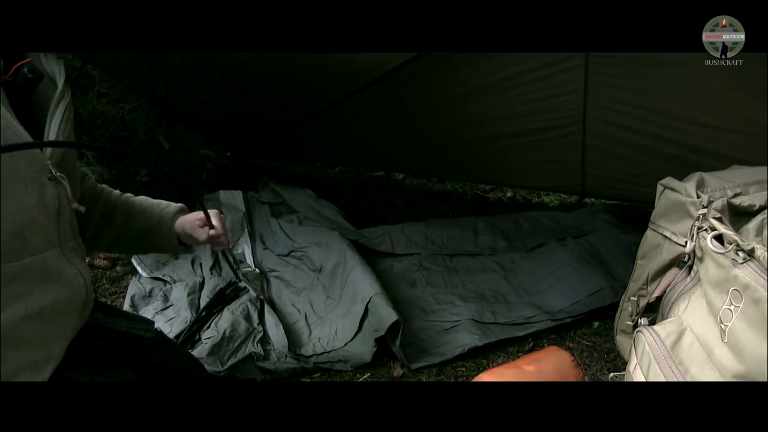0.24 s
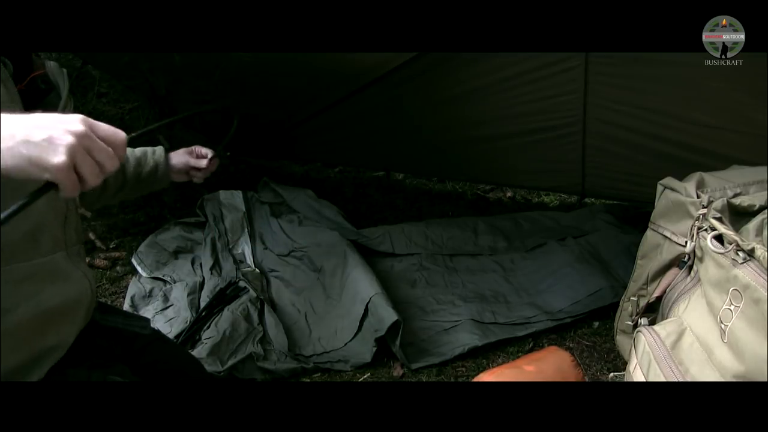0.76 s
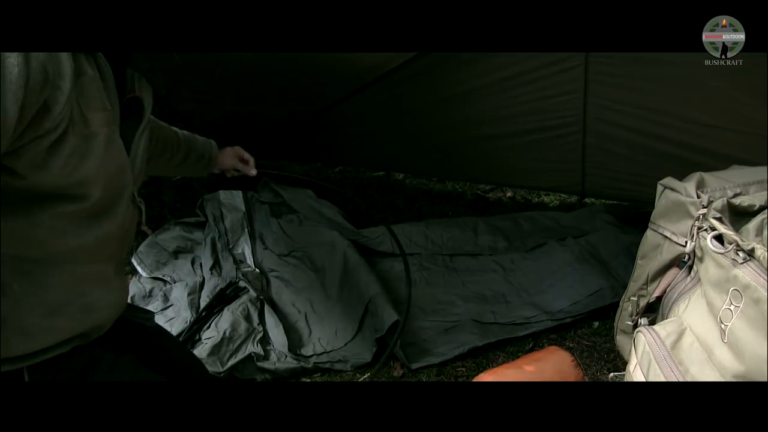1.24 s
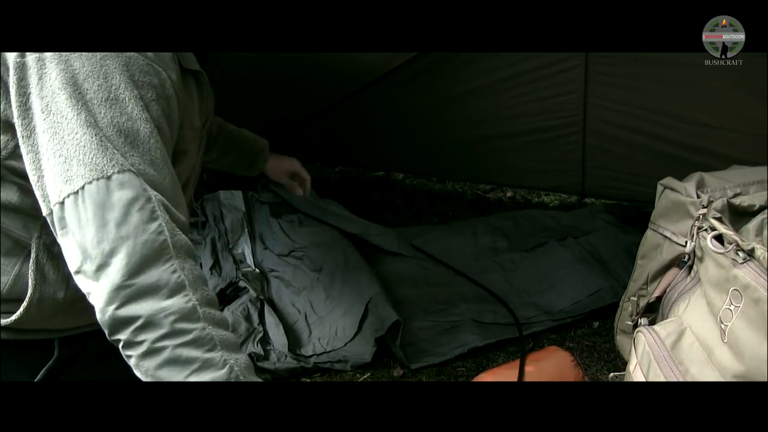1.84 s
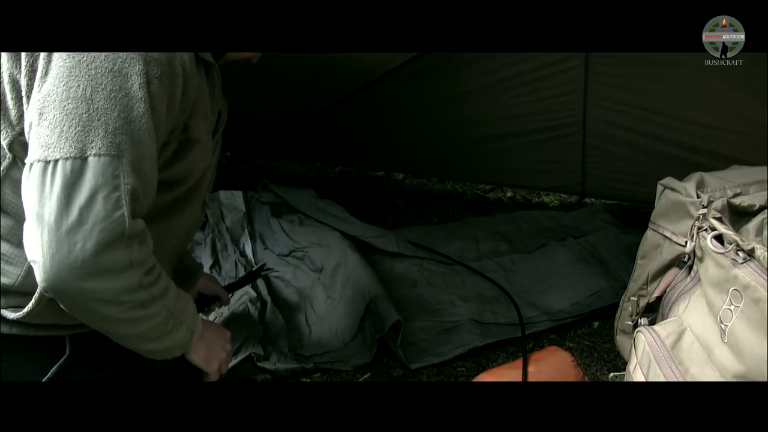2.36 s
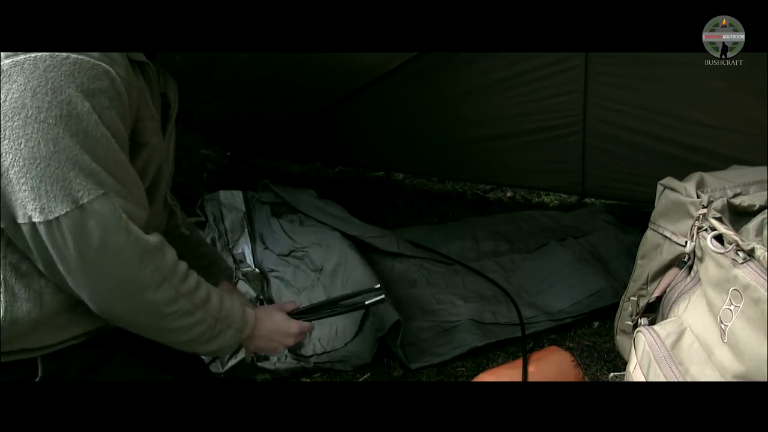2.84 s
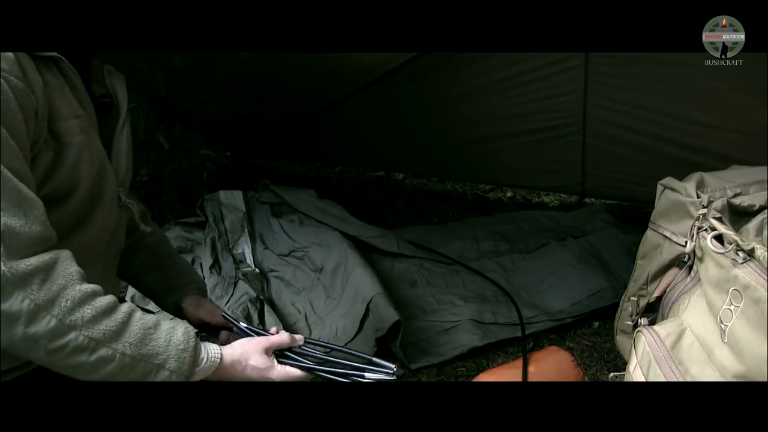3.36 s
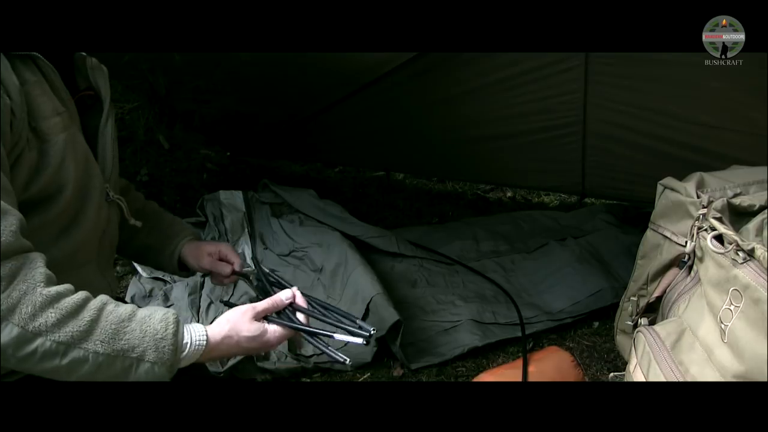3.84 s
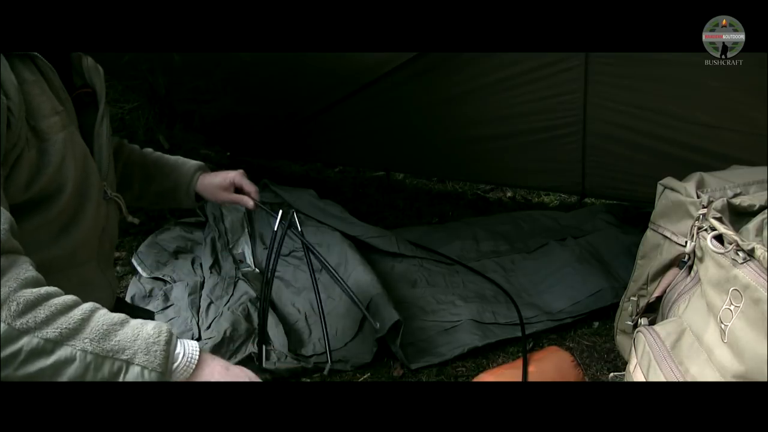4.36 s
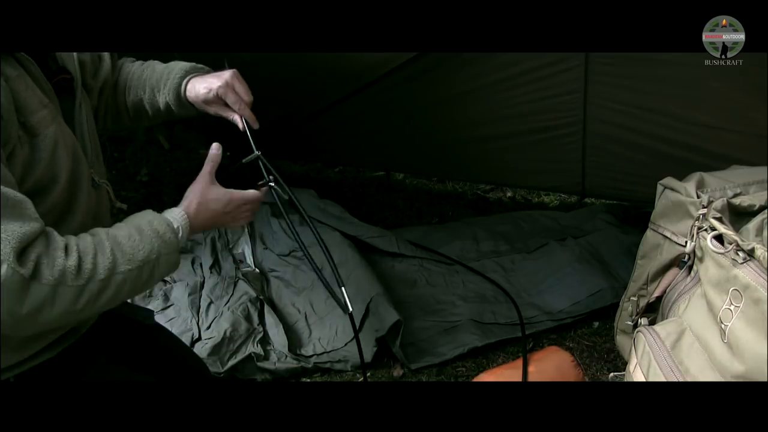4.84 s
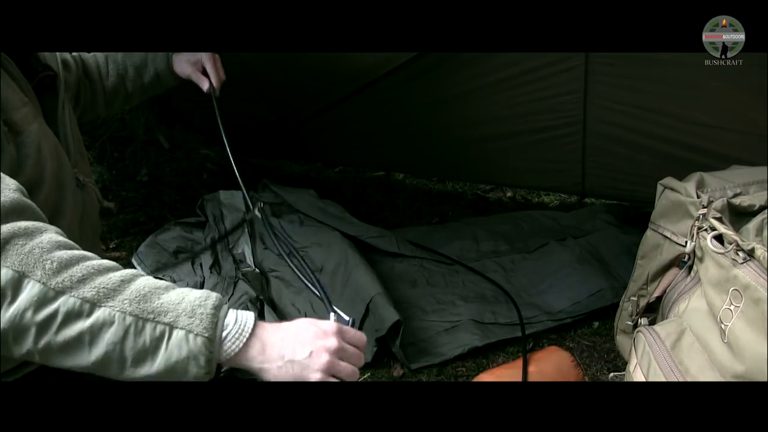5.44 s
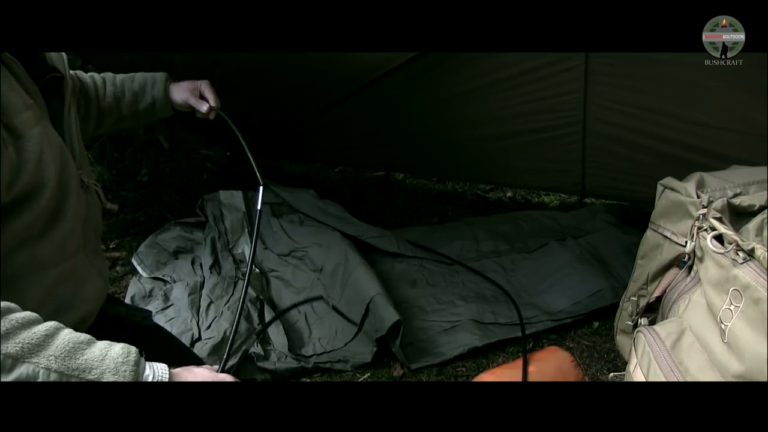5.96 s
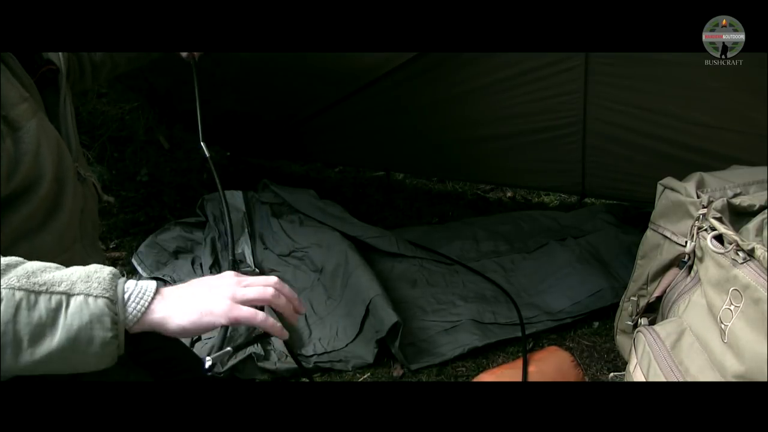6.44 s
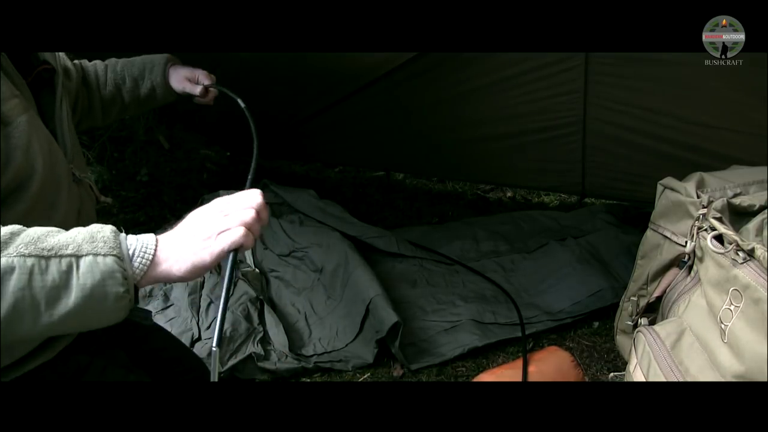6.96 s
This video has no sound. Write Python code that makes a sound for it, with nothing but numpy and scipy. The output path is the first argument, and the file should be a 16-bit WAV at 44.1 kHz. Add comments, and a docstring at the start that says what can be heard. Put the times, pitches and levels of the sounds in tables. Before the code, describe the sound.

A metal tent pole is handled close by, slightly left of centre, in a forest with a soft, low, distant roar throughout. Faint falling bird chirps open, and one section snaps home sharply at 0.3 seconds. A lull follows, with tiny ticks and a barely audible brush of tent cloth around 1 second. Near 2 seconds a hand crunches dry ground litter. From 2.3 seconds loose sections clatter, densest and briefly ringing between 2.7 and 3. Irregular bright clacks continue until about 5.8, with soft rustling of sleeves and sliding sections between them. Hard snaps with a very short metallic ring land at about 4, 4.6, 5.7 and 6 seconds. Faint far bird notes, thin high whistles and chirps echo among the trees from about 4 to 6.6. After a few light ticks and scuffs, a last loud snap comes at 6.9 seconds.

```python
"""Unfolding a tent pole in a forest

Under a tarp, the sections of a shock-corded pole clatter together and snap into their ferrules;
each contact is a hard snap, a short metal ring and a scatter of reflections. Sleeves and sliding
sections rustle between the clicks, the pole brushes the tent cloth and a hand scuffs the ground
litter. Small birds whistle gliding notes that echo among the trees over a low, distant roar."""
import sys
import numpy as np
from scipy import signal
from scipy.fft import rfft, irfft, next_fast_len
from scipy.io import wavfile
from scipy.ndimage import uniform_filter1d, map_coordinates

SR = 44100
rng = np.random.default_rng(int(sys.argv[2]) if len(sys.argv) > 2 else 0)


def generate_wav(signal):
    """Clip the signal to [-1, 1] and save it as 16-bit WAV at the path in sys.argv[1]."""
    frames = np.transpose(np.atleast_2d(signal))
    scaled = np.clip(frames, -1, 1) * 32767
    pcm = np.round(scaled).astype(np.int16)
    wavfile.write(sys.argv[1], SR, pcm)


N = 317520

# A section snaps home, then settles with a second contact. Each row: start in seconds, level in dB,
# bright tone in Hz, treble in dB, hollow tone in Hz, its level in dB, low knock in dB, second contact's
# delay in seconds, its level in dB against the first, left minus right in dB, length of the scrape
# before the snap in seconds, its level in dB against the snap.
FERRULE_SNAPS = [(0.319, -2.5, 6180, -1.5, 3210, -5, -11, 0.0036, -13, 4, 0.003, -34),
                 (4.0114, -4.5, 5400, -1, 2880, -6, -13.5, 0.0028, -2, 0.5, 0.026, -32),
                 (4.6099, -10, 6300, 0, 2775, 2, -8.5, 0.0057, 7, 0.5, 0.0076, -22),
                 (5.6856, -1, 6300, -1, 2550, -10, -12, 0.01, 0.5, 0.5, 0.0086, -23),
                 (6.0304, -10, 9100, 0.5, 3050, -12, -10, 0.013, -5.5, 2.5, 0.0059, -25),
                 (6.8622, -2, 4660, -4.5, 3340, -3, -9, 0.0037, 0.5, 2, 0.0027, -32)]
# Loose sections strike each other. Each row: start in seconds, level in dB, bright tone in Hz,
# treble in dB, hollow tone in Hz, its level in dB, number of rebounds.
LOOSE_CLACKS = [(0.374, -39, 6000, -5, 3300, -13, 0), (0.577, -50, 7500, -3, 3000, -18, 0),
                (0.955, -50, 5500, -2, 2700, -13, 0), (1.008, -43.5, 5130, -1, 2600, -20, 0),
                (2.056, -30.5, 8400, -5, 2700, -18, 0), (2.2733, -19, 5470, -4.5, 2740, -9, 0),
                (2.293, -16.5, 6100, -7, 4010, -3, 0), (2.319, -29, 6000, -5, 3670, -8, 0),
                (2.3457, -4.5, 10200, -0.5, 2490, -9, 0), (2.354, -9, 7150, -7, 2460, -4, 0),
                (2.5603, -13, 5980, -0.5, 2420, -15, 0), (2.5898, -17.5, 6400, -7, 3700, -14, 0),
                (2.6196, -21, 4370, -7, 2730, -20, 0), (2.632, -20.5, 6200, -7, 3620, -3, 0),
                (2.641, -14, 6600, -8, 2900, -23, 0), (2.668, -28, 6140, -15, 3100, -10, 1),
                (2.6995, -13.5, 4560, -3, 2580, -16, 1), (2.733, -18, 4850, -16, 2770, -14, 0),
                (2.7511, -2, 7000, 0.5, 2910, -4, 0), (2.7635, -5, 6650, 0, 2740, -8, 0),
                (2.77, -6.5, 7200, -2, 2780, -6, 2), (2.793, -13, 4140, -9, 2890, 0, 0),
                (2.839, -10, 3920, -5, 2750, -3, 1), (2.858, -3, 4340, -4, 2630, -4.5, 0),
                (2.8658, -2, 9300, 1, 4300, -3, 0), (2.871, -23, 4220, -12, 2780, -12, 0),
                (2.897, -11.5, 8100, 0, 3900, -17, 1), (2.924, -17, 6100, 3, 2660, -30, 0),
                (2.9356, -12.5, 5800, 0, 3020, -23, 0), (2.958, -15, 7600, 3.5, 2600, -23, 0),
                (2.967, -9, 7450, 0, 2630, -22, 1), (2.9854, -15, 4630, 0, 2550, -14, 0),
                (2.9875, -7, 9500, 3, 2530, -16, 0), (3.046, -18.5, 5920, -3.5, 2740, -9, 0),
                (3.2927, -18, 6100, -1.5, 2360, -19, 0), (3.3583, -21, 6580, -2.5, 3100, -14, 0),
                (3.399, -30.5, 10600, -1.5, 3500, -3, 0), (3.483, -27, 4700, -16, 2700, -18, 0),
                (3.531, -33.5, 4400, -17, 2800, 4, 1), (3.565, -5.5, 6160, -3, 2930, -7.5, 0),
                (3.75, -9.5, 4030, -5.5, 2680, -1, 0), (3.804, -22, 4250, -3.5, 2600, -8, 0),
                (3.877, -20.5, 4430, -4.5, 2900, 2, 0), (3.962, -23, 6700, -0.5, 2840, 6.5, 0),
                (4.047, -24, 5200, 2, 2620, 2, 0), (4.141, -10.5, 10840, -0.5, 2860, -2, 1),
                (4.1633, -10, 10550, 0.5, 2920, -11, 1), (4.198, -15.5, 4000, -8, 2380, -2, 0),
                (4.217, -24, 5000, -8, 2820, -1, 0), (4.2585, -12.5, 5070, -14, 3080, -2, 0),
                (4.307, -5.5, 3480, -2.5, 2790, -3.5, 0), (4.319, -16, 4240, -6, 2690, -3, 0),
                (4.333, -18, 4330, -6, 2420, -15, 0), (4.355, -34, 4200, -10, 2700, -12, 0),
                (4.414, -19, 5000, -3.5, 2580, -21, 0), (4.4721, -10, 6660, 0, 2120, -25, 0),
                (4.5086, -18, 5400, -6, 2720, -12, 0), (4.62, -19, 4630, 2, 2820, -6, 1),
                (4.7248, -7, 6000, -4, 3090, -9, 0), (4.827, -29.5, 3750, -27, 2750, 5, 0),
                (4.852, -32.5, 4770, -13, 2770, 3, 0), (5.003, -23.5, 5130, 2, 2600, -9, 0),
                (5.042, -10, 6470, -2, 3060, -1, 0), (5.1253, -18, 4840, -10, 3090, 3.5, 0),
                (5.1665, -16, 5270, -2, 2700, -18, 0), (5.2, -6, 6380, -1.5, 3150, -25, 0),
                (5.231, -15.5, 5680, -6, 2570, -16, 0), (5.447, -32, 9500, -3, 2710, -2, 0),
                (5.4841, -11, 5500, -4, 2630, -10, 0), (5.571, -24, 5900, -14, 2970, 0.5, 0),
                (5.584, -22.5, 5500, -8, 2960, -16, 0), (5.634, -7.5, 4300, -4.5, 3240, -21, 0),
                (5.723, -17, 6500, -5, 3170, -12, 0), (5.7673, -25, 6450, -13, 3300, -9, 0),
                (5.776, -26, 5000, -11, 3300, -2, 0), (5.7938, -18.5, 6830, -8, 3530, -16, 0),
                (5.8323, -19.5, 6500, -8, 3120, -10, 0), (6.304, -38, 6500, -8, 3180, -7, 0),
                (6.4132, -24, 6460, -1.5, 3360, 7.5, 0), (6.442, -37, 7000, 0, 3240, -3, 0)]


def pole(held_loosely_s=(2.72, 2.88)):
    """Sections graze, strike and ring a little left of centre; harder blows ring louder."""
    out = np.zeros((2, N))
    for s, db, *_, scrape_s, scrape_db in FERRULE_SNAPS:
        add(out, s - scrape_s, amp(db + scrape_db) * graze(scrape_s))
    for s, db, pan_db, *voice in contacts():
        ring_db = -17.5 + 0.89 * db
        pan = amp(np.array([[.5], [-.5]]) * (pan_db + 0.66 * rng.standard_normal()))
        graze_s = 0.0041 * rng.uniform(0.76, 2.1)
        add(out, s - graze_s, pan * amp(ring_db - 15.5) * graze(graze_s))
        add(out, s, pan * click(db, ring_db, *voice))
        if held_loosely_s[0] < s < held_loosely_s[1]:
            add(out, s, pan * amp(ring_db - 14.5) * free_ring())
    return out


def contacts(rebound_s=0.0068, rebound_loss_db=7.5, taps_per_s=10):
    """Snaps, rebounding clacks and light handling taps: start, level, pan, then the click's voice."""
    rows = []
    snap_t60, clack_t60 = 0.046, 0.044  # decay of the scatter in seconds
    for s, db, hz, treble_db, hollow_hz, hollow_db, *seating in FERRULE_SNAPS:
        knock_db, delay, second_db, pan_db = seating[:4]
        tones = (treble_db, hz, hollow_hz, hollow_db)
        rows.append((s, db, pan_db, snap_t60, knock_db, *tones))
        rows.append((s + delay, db + second_db, pan_db, snap_t60, knock_db - 9, *tones))
    loose = (1, clack_t60, -20.5)  # pan in dB, scatter decay, knock in dB
    for s, db, hz, treble_db, hollow_hz, hollow_db, rebounds in LOOSE_CLACKS:
        tones = (treble_db, hz, hollow_hz, hollow_db)
        for k in range(round(rebounds) + 1):
            rows.append((s + k * rebound_s, db - k * rebound_loss_db, *loose, *tones))
    for start, end, db in HAND_STROKES:
        for _ in range(round((end - start) * taps_per_s)):
            softness, octaves = rng.standard_normal(2) * (1.5, 0.34)
            hz = 4790 * 2 ** octaves
            tones = (-29.5, hz, 0.61 * hz, -19)  # dull, barely hollow
            rows.append((rng.uniform(start, end), db + 11.5 - softness, *loose, *tones))
    return rows


# The short ring of a gripped section. Each row: pitch in Hz, level in dB, 60 dB decay in seconds.
SECTION_MODES = [(1162, -8.5, 0.037), (1413, -8, 0.029), (2830, -10, 0.0414), (4260, 1, 0.049),
                 (4460, -0.5, 0.031), (5216, -1, 0.058), (6740, 3, 0.04), (7300, -3, 0.037),
                 (7710, 0.5, 0.03), (8800, 10.5, 0.026), (9700, 3.5, 0.04), (10200, -3, 0.045),
                 (11350, -8, 0.032), (13200, -2, 0.035)]
# The noise of metal on metal. Each row: frequency in Hz, spectral level in dB.
CONTACT_SPECTRUM = [(290, -49.5), (450, -19.5), (750, -18), (1770, -14), (2770, -7), (3340, -5.5),
                    (4340, -0.5), (5550, -1), (6510, 0.5), (12300, -7), (15100, -16.5), (16000, -28.5)]


def click(snap_db, ring_db, scatter_t60, knock_db, treble_db, bright_hz, hollow_hz, hollow_db):
    """One contact: a hard snap, its bounce off the ground, ringing metal and scatter under the tarp."""
    t = np.arange(SR // 11) / SR
    snap = causal(stereo_noise(len(t), side_db=-12.5) * amp(-60 * t / 0.0057), CONTACT_SPECTRUM)
    snap /= np.abs(snap).max()
    bounce = np.zeros_like(snap)
    add(bounce, 0.0018 * rng.uniform(0.43, 1.3), snap)
    modes = unit_attack(struck_modes(SECTION_MODES, t, spread_db=7.5, detune=0.0077))
    bright = unit_attack(amp(-60 * t / 0.037) * np.sin(2 * np.pi * bright_hz * t))
    hollow = unit_attack(hollow_tone(hollow_hz, t))
    ring = (modes + amp(-2) * bright + amp(hollow_db) * hollow) * (1 - np.exp(-t / 0.0005))
    faint_tail = amp(-28 - 60 * t / 0.5) * (1 - t / t[-1])
    fade = (1 - np.exp(-t / 0.0016)) * (amp(-60 * t / scatter_t60) + faint_tail)
    scatter = unit_attack(causal(stereo_noise(len(t), side_db=-8) * fade, CONTACT_SPECTRUM))
    attack = amp(snap_db - 0.6) * (snap + amp(-6.5) * bounce)
    body = amp(ring_db) * (amp(-5.5) * ring + scatter)
    # a low shelf gives the blow its weight, a high shelf the brightness of bare metal
    shelves = [(1300, knock_db + 19), (2400, 0.0062), (7500, 0.0086), (11000, treble_db + 3.5)]
    return causal(attack + body, shelves)


def struck_modes(modes, t, spread_db, detune):
    """Decaying partials that vary from blow to blow, as the struck spot and the grip do."""
    hz, db, t60 = np.transpose(modes)[:, :, None]
    strength, offset, phase = rng.standard_normal((3, len(modes), 1))
    angle = 2 * np.pi * (hz * (1 + detune * offset) * t + phase)
    return (amp(db + spread_db * strength - 60 * t / t60) * np.sin(angle)).sum(0)


def hollow_tone(hz, t, sections=6, detune=0.09):
    """Neighbouring sections ring at slightly different pitches, which keeps the tone dry."""
    offset, phase = rng.standard_normal((2, sections, 1))
    angle = 2 * np.pi * (hz * (1 + detune * offset) * t + phase)
    main_mode = amp(-60 * t / 0.042) * np.sin(angle)
    lower_bending_mode = amp(-6 - 60 * t / 0.014) * np.sin(0.61 * angle)
    return (main_mode + lower_bending_mode).sum(0)


def graze(length_s):
    """The tip scrapes the other section, harder and harder, just before it strikes."""
    swell = amp(5.6 * np.linspace(-1, 0, int(length_s * SR)))
    return swell * coloured_noise(CONTACT_SPECTRUM, side_db=-11, size=len(swell))


# The long ring of a loose bundle. Each row: pitch in Hz, level in dB, 60 dB decay in seconds.
UNDAMPED_MODES = [(2310, -10.5, 0.33), (2760, -1, 0.18), (2960, -10, 0.11), (4000, -4, 0.13),
                  (4400, 0, 0.17)]


def free_ring():
    """Sections that no hand damps ring on after a blow."""
    return struck_modes(UNDAMPED_MODES, np.arange(SR // 4) / SR, spread_db=2, detune=0.002)


# Moves of sleeves and sliding sections. Each row: start in seconds, end in seconds, level in dB.
HAND_STROKES = [(0.326, 0.419, -52), (2.206, 2.496, -47.5), (2.258, 2.39, -44.5), (2.583, 2.772, -44.5),
                (2.776, 3.027, -40.5), (3.027, 3.098, -40.5), (3.859, 4.145, -50.5), (3.933, 4.078, -37),
                (4.152, 4.56, -45.5), (4.63, 4.73, -47), (4.91, 5.081, -43.5), (5.075, 5.486, -49.5),
                (5.602, 5.724, -33), (5.745, 6.035, -45), (6.069, 6.214, -46.5), (6.332, 6.474, -46),
                (6.784, 6.888, -43), (6.71, 7.125, -66.5)]
# The colour of their rustle. Each row: frequency in Hz, spectral level in dB.
RUSTLE_SPECTRUM = [(530, -19), (900, -9.5), (1660, -5.5), (2070, -1), (3040, 0), (3470, 3.5), (4050, 3.5),
                   (6560, 1.5), (13000, -8), (15100, -27), (16000, -66.5)]
SWELL_S, FADE_S = 0.045, 0.05  # the hand speeds up and slows down


def rustle(catches_per_s=170, catch_t60=0.025):
    """Friction hiss swells and fades, ticking as the cloth catches, tinted by the pole's modes."""
    effort, t = np.zeros(N), np.arange(SR // 30) / SR
    for start, end, db in HAND_STROKES:
        age = np.arange(0, end - start, 1 / SR)
        add(effort, start, amp(db) * np.minimum(age / SWELL_S, 1) * np.minimum(age[::-1] / FADE_S, 1))
    catches = (rng.random(N) < catches_per_s / SR) * rng.random(N) ** 2
    ticks = np.abs(signal.fftconvolve(catches, amp(-60 * t / catch_t60))[:N])
    texture = amp(0.55 * wobble(40)) * (1 + 2.6 * ticks)
    grid_hz = np.linspace(0, SR / 2, 2000)
    resonances = sum(1 / (1 + ((grid_hz - hz) / 70) ** 2) for hz, *_ in SECTION_MODES)
    hiss = coloured_noise(RUSTLE_SPECTRUM, side_db=-11)
    tinted = filtered(hiss, lambda hz: 1 + 0.3 * np.interp(hz, grid_hz, resonances))
    return effort * unit(texture * tinted)


# A hand on the ground. Each row: start in seconds, level in dB, thud in dB against the crunch,
# 60 dB decay in seconds.
HAND_SCUFFS = [(0.264, -38.5, -8, 0.23), (1.848, -31, -7, 0.16), (1.869, -35, -11, 0.08),
               (1.906, -32.5, 7, 0.067), (1.922, -37.5, 1.5, 0.57), (1.980, -24, -7, 0.1),
               (4.009, -48, 4, 0.043), (6.104, -36.5, 3.5, 0.2), (6.826, -37, -6.5, 0.67)]
# The crunch of dry litter. Each row: frequency in Hz, spectral level in dB.
LITTER_SPECTRUM = [(410, -53.5), (700, -41), (922, 0), (1500, -5.5), (3990, 2.5), (8990, -1.5),
                   (14400, -12), (16000, -40)]


def scuffs():
    """Dry litter crunches under the hand, over a dull thud of the soil."""
    out, t = np.zeros((2, N)), np.arange(SR // 2) / SR
    soil_spectrum = [(50, -41), (130, -1), (400, 5), (1100, -1.5), (3000, -8), (9000, -48.5)]
    for s, db, thud_db, t60 in HAND_SCUFFS:
        grains = unit(amp(0.4 * jitter(len(t), smoothing=60)))
        crunch = grains * coloured_noise(LITTER_SPECTRUM, side_db=-11, size=len(t))
        thud = coloured_noise(soil_spectrum, side_db=-20, size=len(t))
        envelope = amp(db - 60 * t / t60) * (1 - np.exp(-t / 0.0008))
        add(out, s, envelope * (crunch + amp(thud_db) * thud))
    return out


# The sheen of rubbed tent cloth. Each row: frequency in Hz, spectral level in dB.
CLOTH_SPECTRUM = [(800, -20), (2200, -1), (5000, -8), (9000, 0), (13500, 5), (15000, -12), (16000, -35)]


def cloth_swish(start_s=0.9, end_s=1.36, db=-64):
    """The pole is drawn along the tent cloth: a soft, bright, even hiss."""
    gate = curve([(start_s, 0), (start_s + SWELL_S, 1), (end_s - FADE_S, 1), (end_s, 0)])
    return gate * amp(db + 0.99 * wobble(17.7)) * coloured_noise(CLOTH_SPECTRUM, side_db=-4)


# Bird notes. Each row: start in seconds, length in seconds, middle pitch in Hz, level in dB.
WARBLER_CHIRPS = [(0.011, 0.017, 3620, -41.5), (0.03, 0.023, 3280, -52), (0.099, 0.012, 3510, -48),
                  (0.163, 0.023, 3530, -40.5), (0.235, 0.017, 3130, -50), (0.4, 0.02, 3200, -50),
                  (0.475, 0.013, 3120, -54), (0.535, 0.02, 3260, -52), (0.585, 0.0163, 3770, -45.5),
                  (0.612, 0.02, 3550, -48), (0.675, 0.033, 4170, -56), (0.695, 0.023, 3590, -52),
                  (0.735, 0.023, 3930, -52), (6.358, 0.038, 3940, -43.5)]
WARBLER_SLURS = [(0.083, 0.023, 3560, -47.5), (6.433, 0.043, 3860, -47.5), (6.533, 0.064, 3810, -44.5)]
THIN_WHISTLES = [(4.855, 0.052, 8260, -50), (4.905, 0.036, 8200, -49), (5.81, 0.036, 7800, -52),
                 (5.87, 0.048, 7850, -43), (5.945, 0.078, 8100, -43), (6.05, 0.1, 7500, -46),
                 (6.21, 0.083, 8150, -45.5)]
FAR_NOTES = [(3.87, 0.093, 2970, -53), (4.05, 0.052, 3180, -58), (4.16, 0.11, 4250, -48.5),
             (4.28, 0.026, 5000, -44), (4.33, 0.038, 3980, -43), (4.5, 0.049, 2960, -49),
             (5.12, 0.085, 4070, -47), (5.21, 0.16, 4510, -51)]


def birds():
    """A warbler's falling chirps and rising slurs, thin rising whistles and a far, blurred singer."""
    return (
        bird(WARBLER_CHIRPS, octaves=-0.38, bend=0.87, detune=0.0095, waver=0.024, dry_db=-4.5, wet_db=0)
        + bird(WARBLER_SLURS, octaves=0.31, bend=0.89, detune=0.006, waver=0.018, dry_db=-1.5, wet_db=2)
        + bird(THIN_WHISTLES, octaves=0.079, bend=1.44, detune=0.0028, waver=0.017,
               dry_db=-4.5, wet_db=-4)
        + bird(FAR_NOTES, octaves=-0.161, bend=0.47, detune=0.012, waver=0.068, dry_db=-8, wet_db=0.5))


def bird(notes, octaves, bend, detune, waver, dry_db, wet_db):
    """Each note is a wavering whistle that glides by some octaves, heard direct and off the trees."""
    song = np.zeros(N)
    for s, length, middle_hz, db in notes:
        progress = np.linspace(0, 1, max(int(length * SR), 2))
        glide = 2 ** (octaves * (progress ** bend - .5))
        hz = middle_hz * (1 + detune * rng.standard_normal()) * glide
        hz *= 1 + waver * jitter(len(hz), smoothing=40)
        arch = np.sqrt(np.abs(np.sin(np.pi * progress)))
        add(song, s, amp(db) * unit(arch * np.sin(2 * np.pi * np.cumsum(hz) / SR)))
    return amp(dry_db) * song + amp(wet_db) * forest_echo(song)


# The reverb of the trees. Each row: frequency in Hz, 60 dB decay in seconds.
FOREST_DECAY = [(2000, 1), (4000, 1), (9000, 0.53)]


def forest_echo(song):
    """Near foliage blurs a call and the trunks send back a long, diffuse echo."""
    hz, t, noise = signal.stft(rng.standard_normal((2, SR)), SR, nperseg=256)
    trunks = amp(-60 * t / along(FOREST_DECAY, hz)[:, None])
    foliage = amp(6.5 - 60 * t / 0.044)
    mid, side = signal.istft(noise * (trunks + foliage), SR, nperseg=256)[1]
    tail = mid + amp(-2) * np.array([side, -side])
    return signal.fftconvolve(song[None], tail / np.linalg.norm(tail[0]), axes=1)[:, :N]


# The slow swell of the roar. Each row: time in seconds, level in dB.
ROAR_SWELL = [(0.0, -40.5), (0.5, -41.5), (1.25, -42.5), (1.5, -39.5), (1.75, -43), (2.1, -42.5),
              (2.3, -39), (2.8, -41.5), (3.2, -38), (3.45, -40.5), (4.1, -42.5), (4.65, -36.5),
              (4.92, -41.5), (5.35, -36.5), (5.7, -39.5), (5.95, -37), (6.5, -40), (7.2, -37.5)]
# Its dark colour. Each row: frequency in Hz, spectral level in dB.
ROAR_SPECTRUM = [(22, -42), (35, -65), (55, -21), (150, -22), (180, -12), (200, -8.5), (235, 2), (290, 1.5),
                 (335, -7), (395, -14.5), (460, -16.5), (490, -10.5), (600, -16), (700, -23), (1100, -35),
                 (2500, -68)]
# Its width, narrowest in the bass. Each row: frequency in Hz, left-right correlation.
ROAR_CORRELATION = [(60, 0.96), (280, 0.84), (500, 0.6), (1200, 0.3)]


def distant_roar(flutter_db=0.93, flank_hz=185):
    """A low, far-off roar that flutters slightly and deepens as it swells."""
    def mid_side_gains(hz):
        width = np.arccos(np.clip(along(ROAR_CORRELATION, hz), -1, 1)) / 2
        return amp(along(ROAR_SPECTRUM, hz)) * [np.cos(width), np.sin(width)]

    mid, side = filtered(rng.standard_normal((2, N)), mid_side_gains)
    roar = unit(np.array([mid + side, mid - side]))
    level_db = curve(ROAR_SWELL)
    low_flank = filtered(roar, lambda hz: np.exp(-((hz - flank_hz) / 50) ** 2))
    flank_gain = amp(level_db - level_db.mean() - 2.5)
    roar += (flank_gain - 1) * low_flank
    return amp(level_db + 0.75 + flutter_db * wobble(11)) * roar


# The bed of forest air. Each row: frequency in Hz, spectral level in dB.
AIR_SPECTRUM = [(530, -7), (900, -4.5), (2250, -9.5), (4150, -10.5), (4980, -12.5), (8760, -17),
                (13700, -23.5), (16000, -57)]


def air():
    """The faint, steady hiss of the air."""
    return amp(-57) * coloured_noise(AIR_SPECTRUM, side_db=-5)


def amp(db):
    """Decibels to gain."""
    return 10 ** (np.asarray(db) / 20)


def unit(x):
    """Scale to rms 1."""
    return x / np.sqrt(np.mean(x ** 2) + 1e-20)


def unit_attack(x):
    """Scale so that the first 10 ms have rms 1."""
    return x / np.sqrt(np.mean(x[..., :SR // 100] ** 2))


def along(points, hz):
    """(Hz, value) points read on a log axis."""
    f, v = np.transpose(points)
    return np.interp(np.log(hz + 1), np.log(f + 1), v)


def curve(rows):
    """(seconds, value) rows as one value per sample."""
    return np.interp(np.arange(N) / SR, *np.transpose(rows))


def wobble(rate):
    """A smooth random curve, rate knots a second."""
    return map_coordinates(rng.standard_normal(int(N * rate / SR) + 4), [np.arange(N) * rate / SR])


def jitter(size, smoothing):
    """Noise of rms 1, smoothed over a number of samples."""
    return unit(uniform_filter1d(rng.standard_normal(size), size=smoothing))


def filtered(x, response):
    """Filter by a gain given as a function of Hz."""
    n = x.shape[-1]
    padded = next_fast_len(n + 4096)
    return irfft(rfft(x, padded) * response(np.fft.rfftfreq(padded, 1 / SR)), padded)[..., :n]


def causal(x, spectrum, size=8192):
    """Colour a short sound by (Hz, dB) points without smearing it ahead of its attack."""
    gain = amp(along(spectrum, np.fft.rfftfreq(size, 1 / SR)))
    cepstrum = irfft(np.log(gain + 1e-6))
    cepstrum[1:size // 2] *= 2  # fold to minimum phase
    cepstrum[size // 2 + 1:] = 0
    return irfft(rfft(x, size) * np.exp(rfft(cepstrum)))[..., :x.shape[-1]]


def stereo_noise(size, side_db):
    """White noise whose width is set by the side level."""
    mid, side = rng.standard_normal((2, size))
    return unit(mid + amp(side_db) * np.array([side, -side]))


def coloured_noise(spectrum, side_db, size=N):
    """Stereo noise of rms 1, shaped by (Hz, dB) points."""
    return unit(filtered(stereo_noise(size, side_db), lambda hz: amp(along(spectrum, hz))))


def add(track, s, sound):
    """Mix a sound into a track at s seconds."""
    part = track[..., max(round(s * SR), 0):][..., :sound.shape[-1]]
    part += sound[..., :part.shape[-1]]


def scene():
    """The pole and the hands close by; birds, roar and air in the forest beyond."""
    birdsong = birds()
    close_by = pole() + scuffs() + rustle() + cloth_swish()
    return close_by + birdsong + distant_roar() + air()


def record(dry):
    """Peaks clip at full scale and the top end is cut off steeply."""
    top_hz = 15900
    return filtered(np.clip(dry, -1, 1), lambda hz: 1 / np.sqrt(1 + (hz / top_hz) ** 160))


dry = scene()
out = record(dry)
generate_wav(out)
```